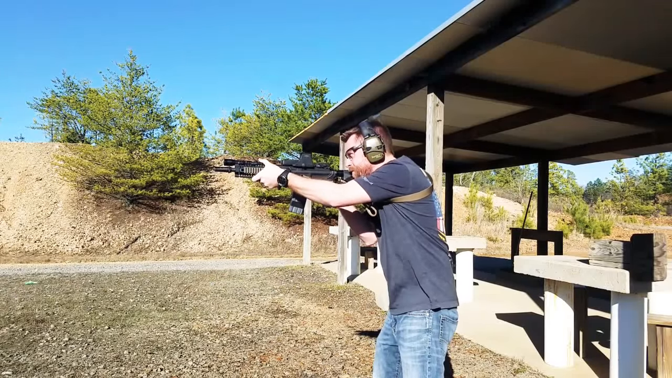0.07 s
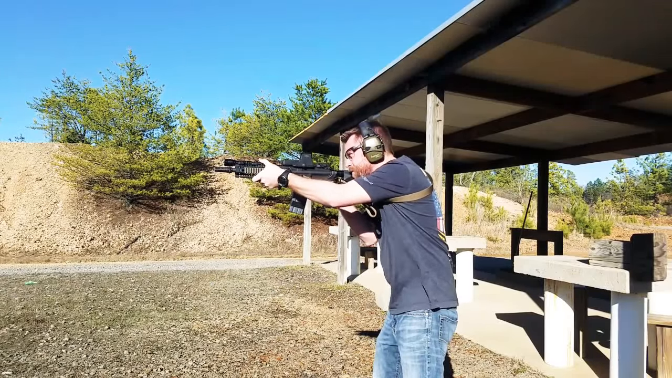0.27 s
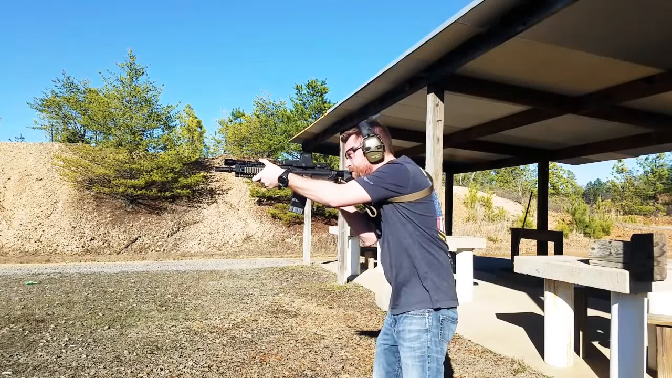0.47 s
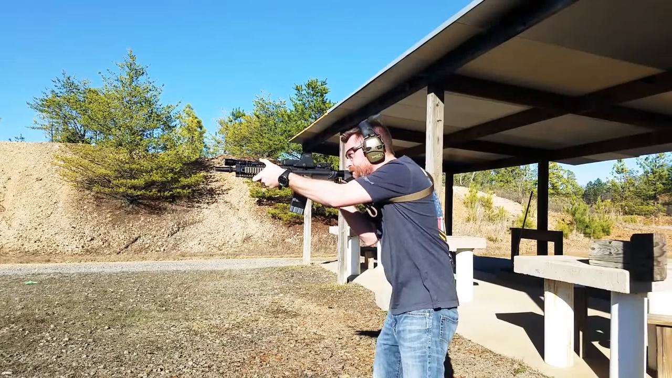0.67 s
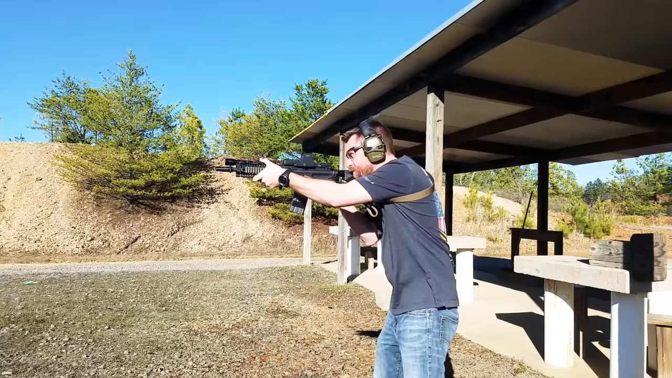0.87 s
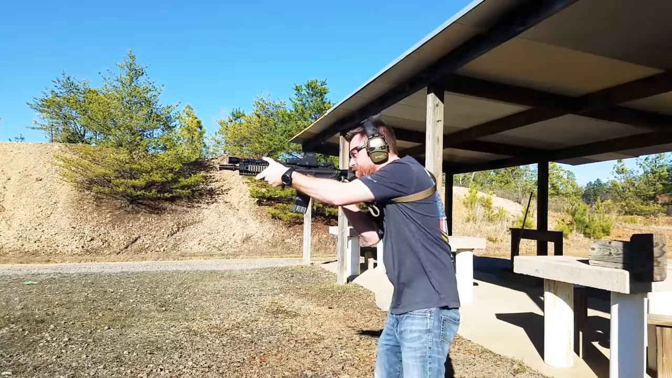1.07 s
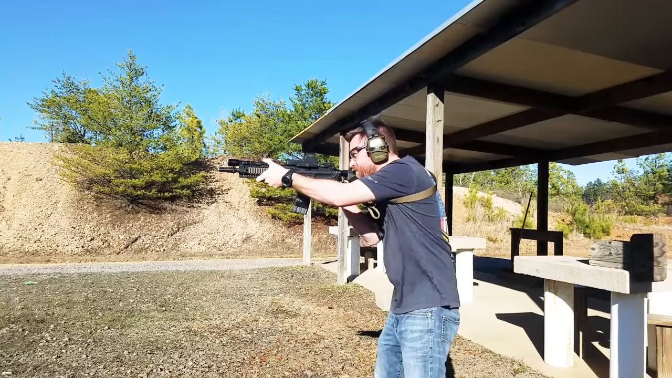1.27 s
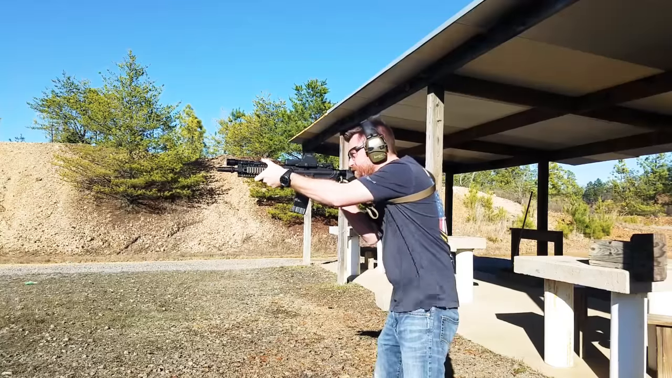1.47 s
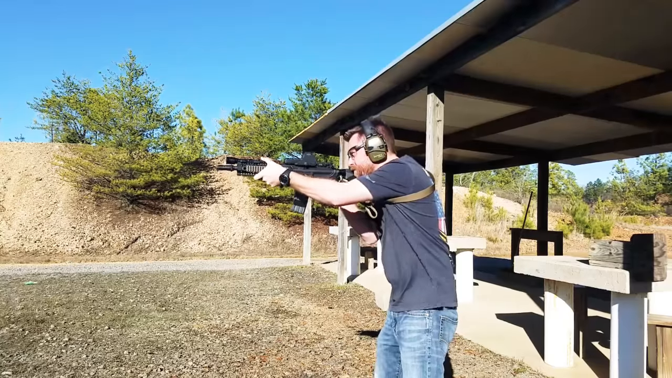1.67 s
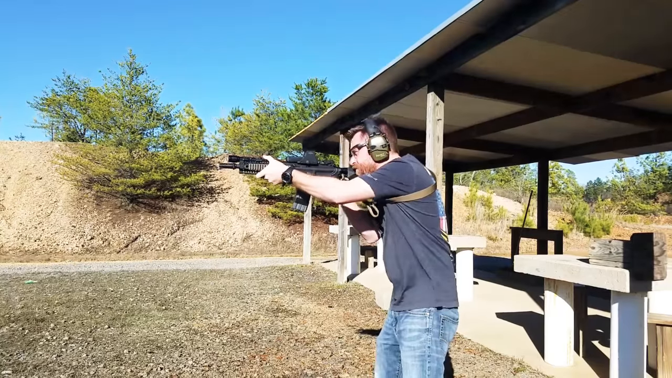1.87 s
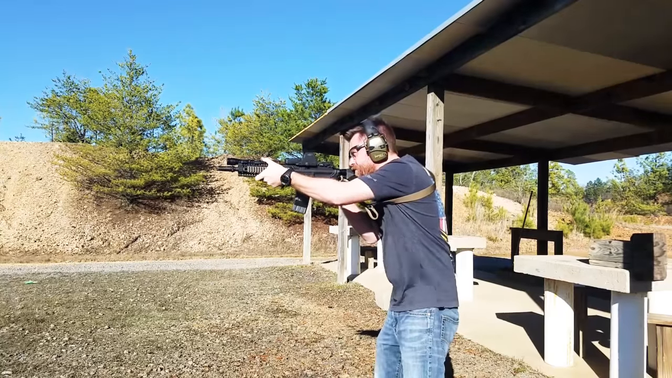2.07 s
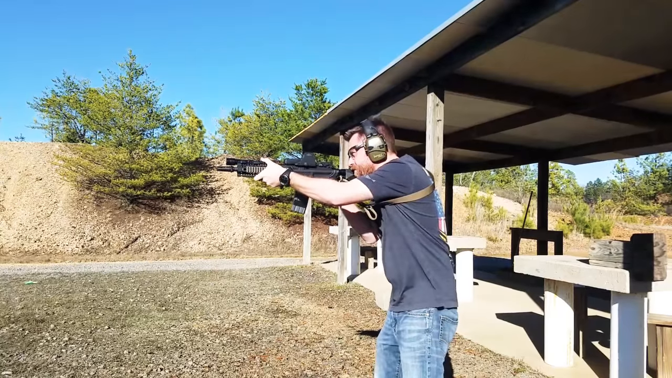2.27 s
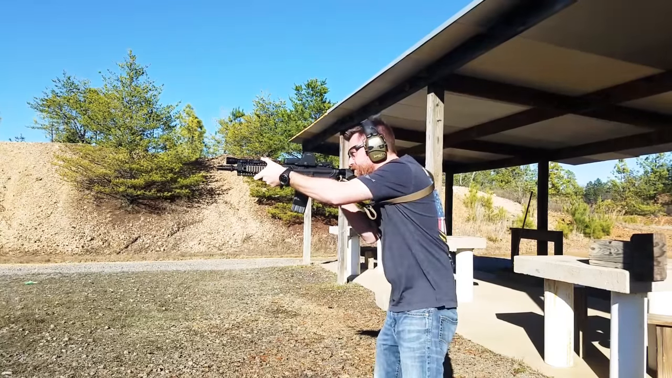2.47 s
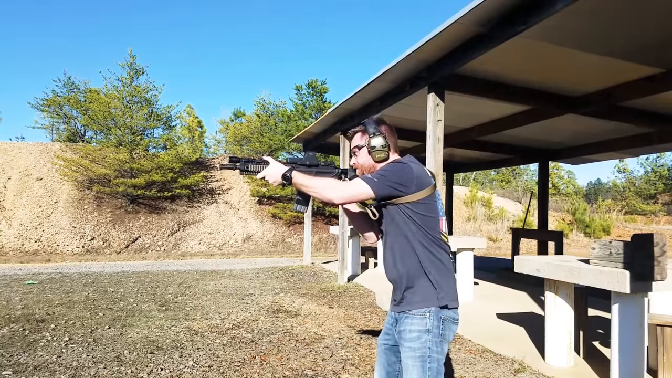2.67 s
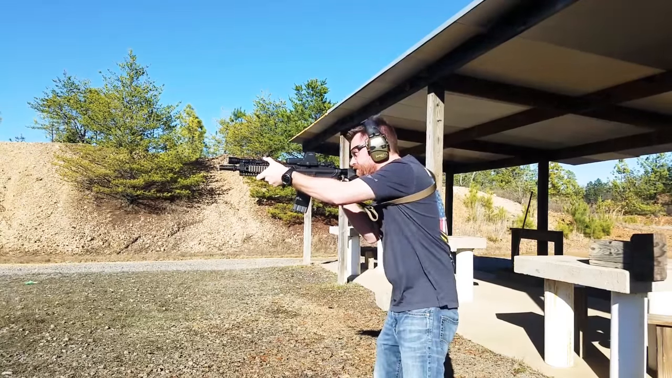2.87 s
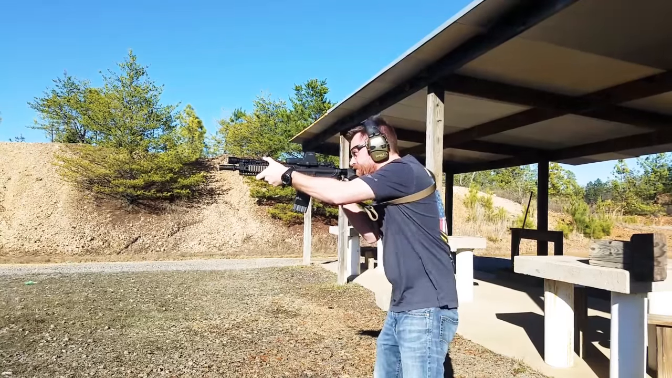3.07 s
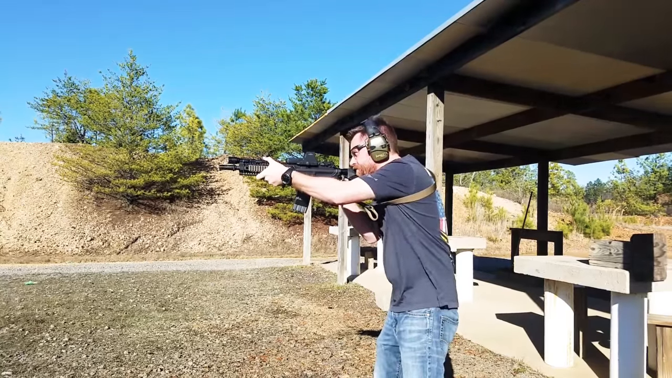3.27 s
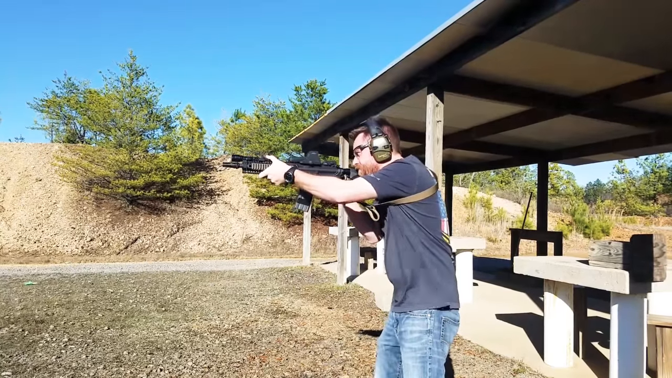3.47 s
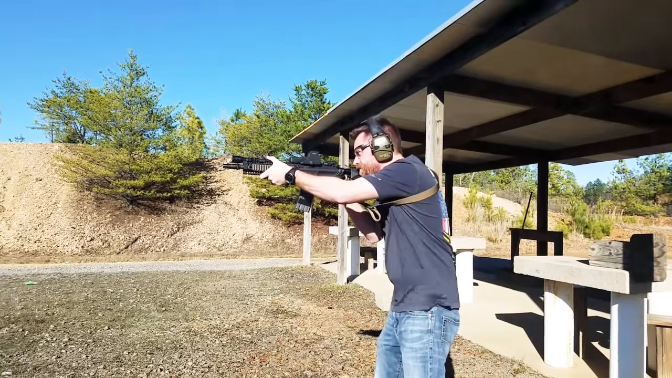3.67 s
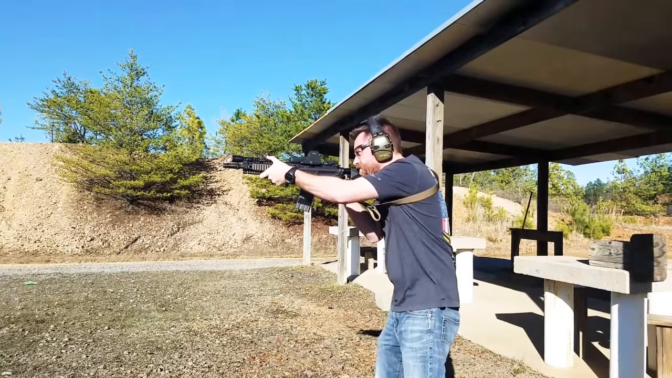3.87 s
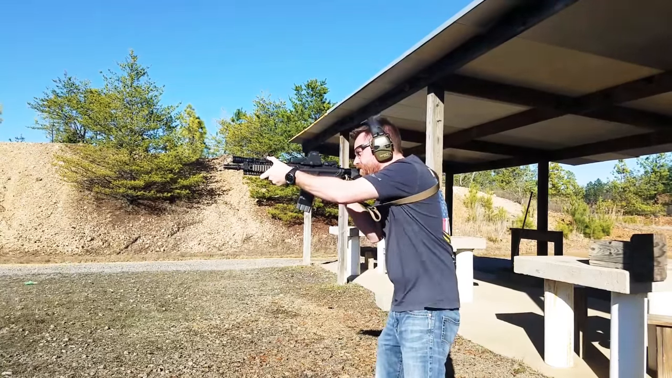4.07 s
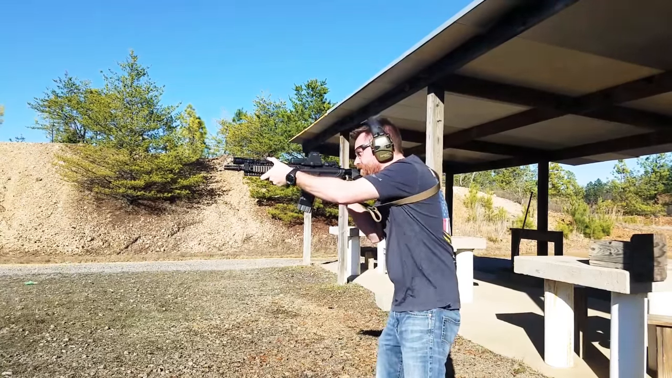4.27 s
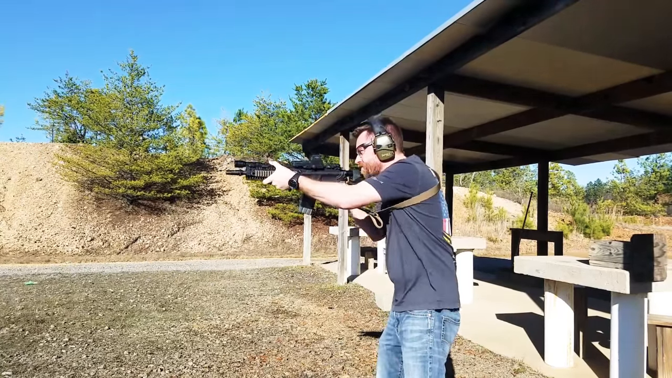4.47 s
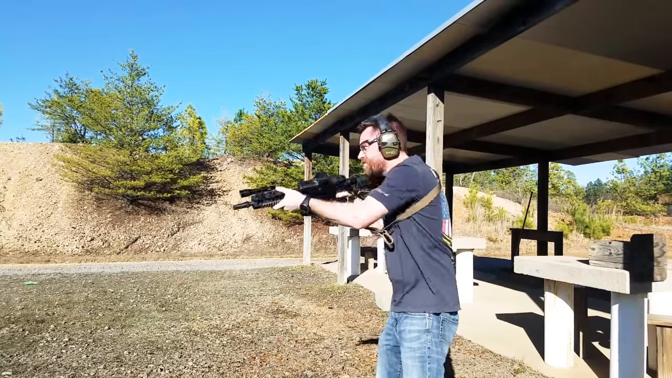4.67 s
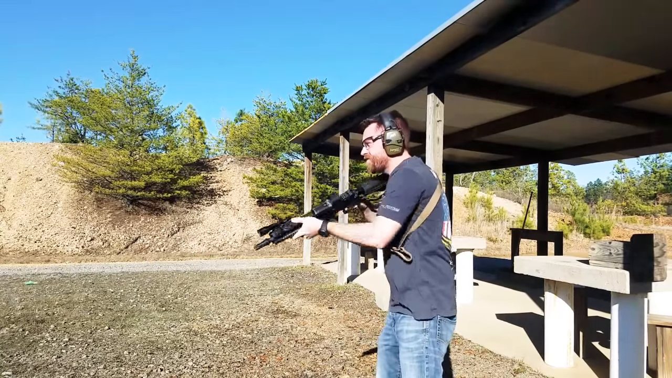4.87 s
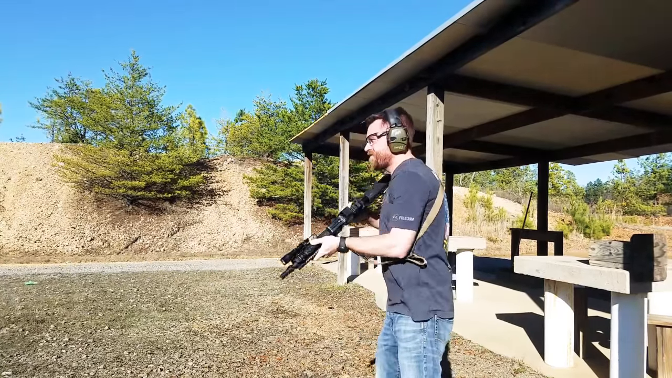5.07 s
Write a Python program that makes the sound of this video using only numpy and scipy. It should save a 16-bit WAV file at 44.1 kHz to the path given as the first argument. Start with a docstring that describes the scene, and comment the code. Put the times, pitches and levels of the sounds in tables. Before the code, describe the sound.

Four evenly spaced suppressed rifle shots crack at an open-air range, each roaring under a roof and washing out through woods, with light wind rumble.

```python
"""Wind buffets two microphone ports over an even hiss of distant trees; then a trigger clicks and a rifle fires.
Four suppressed shots sound beside a roofed firing line: bright noise cracks, low thumps and ringing steel sines.
Each is answered by noise and resonances roaring under the roof, echoes off the banks and a long wash from the woods.
Metal clicks dryly and a spent case rings as it bounces; a gain control dips at each shot and holds before rising."""
import sys
import numpy as np
from scipy import signal
from scipy.fft import rfft, irfft
from scipy.io import wavfile
from scipy.ndimage import uniform_filter1d, minimum_filter1d

SR = 44100
rng = np.random.default_rng(int(sys.argv[2]) if len(sys.argv) > 2 else 0)


def dump_mix(stems):
    """Bounce the given channels to the path in sys.argv[1] as a 16-bit WAV at rate SR."""
    frames = np.atleast_2d(stems).T  # one column per channel
    limited = np.clip(frames, -1, 1)  # hard clip at full scale
    pcm = np.round(limited * 32767).astype(np.int16)
    wavfile.write(sys.argv[1], SR, pcm)


N = 225428
AGE = np.arange(2 * SR) / SR  # seconds since an onset


def undb(db):
    """Level and amplitude: every 20 dB is a factor of ten in gain."""
    return 10 ** (np.asarray(db) / 20)


def unit(x):
    """Normalisation: scale to an rms of 1 over all channels."""
    return x / np.sqrt(np.mean(x ** 2))


def read(points, hz):
    """Spectral interpolation: read (Hz, value) points on a log-frequency axis."""
    point_hz, value = np.transpose(points)
    return np.interp(np.log(hz + 0.00092), np.log(point_hz), value)  # the offset avoids log(0)


def hump(centre_hz, octaves):
    """Band-limited spectrum: a bell of (Hz, dB) points, `octaves` wide between its -1 dB points."""
    steps = np.arange(-9, 10)
    hz = centre_hz * 2 ** (steps * octaves / 2)
    return np.transpose([hz, -steps ** 2])


def noise(points, size, lag_ms=0.28, alike_hz=1600):
    """Spatial coherence: coloured noise reaches the left port later, and only its bass is alike at both."""
    hz = np.fft.rfftfreq(size, 1 / SR)
    right, other = rfft(rng.standard_normal((2, size)))
    alike = 1 / (1 + (hz / alike_hz) ** 2)
    left = alike * right + np.sqrt(1 - alike ** 2) * other
    left = left * np.exp(-2j * np.pi * hz * lag_ms / 1000)  # a delay is a phase slope
    coloured = np.array([left, right]) * undb(read(points, hz))
    return unit(irfft(coloured, size))


def tone(hz, lag_ms=0.325):
    """Simple harmonic motion: a sine of rms 1 that reaches the left port later."""
    lag_s = np.array([[lag_ms / 1000], [0]])
    cycles = hz * (AGE - lag_s) + rng.random()
    return np.sqrt(2) * np.sin(2 * np.pi * cycles)


def fade(t60, hold=0):
    """Exponential decay: full level until hold, then a fall of 60 dB in each t60 seconds."""
    return np.exp(-np.log(1000) * np.maximum(AGE - hold, 0) / t60)


def swell(rise_s):
    """Gradual onset: a rounded rise towards full level."""
    return 1 - np.exp(-(AGE / rise_s) ** 2)


def burst(sound, envelope):
    """Energy conservation: shape a steady sound in time, keeping the energy that the envelope promises."""
    promised_rms = np.sqrt(np.mean(envelope ** 2) * np.mean(sound ** 2))
    return unit(sound * envelope) * promised_rms


def walk(rate):
    """Random fluctuation: smooth wandering of spread near 1, with `rate` new values a second."""
    step = int(SR / rate)
    stairs = np.repeat(rng.standard_normal(N // step + 1), step)
    return unit(uniform_filter1d(stairs, step)[:N])


def add(out, s, sound):
    """Superposition: mix a sound in from time s."""
    start = int(s * SR)
    part = sound[:, :out.shape[1] - start]
    out[:, start:start + part.shape[1]] += part


# Colour of air rumbling on the ports. Each row: frequency in Hz, relative spectral level in dB;
# the frequencies shift with the strength of the wind.
WIND_COLOUR = [(13, -38.5), (22, -24), (69, -1), (124, 0.5), (174, -4.5), (204, -5.5), (352, -6.5),
               (538, -16.5), (753, -19), (1500, -35.5), (1950, -66.5), (3300, -120)]
BRIGHTER_OCTAVES_PER_DB, USUAL_DB = 0.047, -51.5  # upward shift; level at which the colour is unshifted


def airflow(db, size):
    """Turbulence: faster air sheds quicker eddies, so a stronger rumble is brighter."""
    shift = 2 ** (BRIGHTER_OCTAVES_PER_DB * (db - USUAL_DB))
    colour = [(hz * shift, level) for hz, level in WIND_COLOUR]
    return undb(db) * noise(colour, size, lag_ms=0.076, alike_hz=25)


# Gusts on the ports. Each row: start in seconds, rise in seconds, length held before fading in seconds,
# level in dB before flutter and the balance of the ports.
GUSTS = [(0.408, 0.07, 0.41, -54.5), (0.89, 0.0056, 1.35, -50), (2.85, 0.11, 1.34, -50),
         (4.199, 0.018, 0.29, -50.5), (4.46, 0.067, .6, -48)]
CALM_DB, GUST_T60_S = -58, 0.3


def gusts(flutter_db=2.5):
    """Unsteady flow: gusts swell, hold and drop over a light breeze, fluttering separately at each port."""
    buffet = airflow(CALM_DB, N)
    for s, rise, length, db in GUSTS:
        add(buffet, s, airflow(db, len(AGE)) * swell(rise) * fade(GUST_T60_S, hold=length))
    return buffet * undb(flutter_db * np.array([walk(25), walk(25)]))


# The strongest eddies. Each row: start in seconds, level in dB before its envelope and the balance of the ports.
EDDIES = [(.018, -52.5), (0.698, -47), (.787, -42.5), (0.899, -50.5), (4.989, -52), (5.057, -47.5)]
EDDY_HZ = 118


def eddies():
    """Pressure pulses: strong eddies slap the ports with short low noise."""
    out = np.zeros((2, N))
    for s, db in EDDIES:
        slap = noise(hump(EDDY_HZ, 0.63), len(AGE), lag_ms=0.12, alike_hz=25)
        envelope = swell(rise_s=0.0012) * fade(t60=0.063, hold=0.022)
        add(out, s, undb(db) * burst(slap, envelope))
    return out


# Colour of the distant trees. Each row: frequency in Hz, relative spectral level in dB.
TREES_COLOUR = [(290, -38.5), (500, -1), (659, -4.5), (856, -6.5), (1280, -13.5), (1330, -13), (1800, -7),
                (2380, -14), (3000, -20), (4300, -25.5), (9560, -30.5), (13500, -27.5)]


def distant_trees(trees_db=-70):
    """Broadband noise: distant trees hiss almost evenly, wavering slightly."""
    hiss = noise(TREES_COLOUR, N, lag_ms=.05, alike_hz=1488)
    return hiss * undb(trees_db + .4 * walk(1.8))


def breeze(right_db=4.0):
    """Near-field turbulence: wind strikes the right port harder, while distant trees hiss at both."""
    balance = undb(np.array([[-right_db], [right_db]]) / 2)
    return (gusts() + eddies()) * balance + distant_trees()


def contact(centre_hz, scatter_db):
    """Impact excitation: a light metal contact gives a short click and a faint scatter from the roof."""
    decay = fade(t60=0.012) + undb(scatter_db) * fade(t60=0.085)
    return noise(hump(centre_hz, 0.96), len(AGE)) * swell(rise_s=0.0015) * decay


# Clicks of trigger and action. Each row: start in seconds, level in dB before the envelope, centre in Hz.
CLICKS = [(1.0219, -41, 7000), (1.778, -49, 2420), (2.425, -52, 3000), (2.606, -28.5, 1200),
          (3.2115, -55, 3430)]


def trigger_and_action():
    """Damped impact: the trigger and action click dryly, in bands of noise."""
    out = np.zeros((2, N))
    for s, db, hz in CLICKS:
        add(out, s, undb(db) * contact(hz, scatter_db=-10.5))
    return out


# Colour of the crack. Each row: frequency in Hz, relative spectral level in dB.
CRACK_COLOUR = [(47, -51), (80, -32), (339, -5), (731, -1.5), (971, 2), (2040, -5.5), (2380, -8),
                (2600, -5.5), (3610, -10), (4210, -11), (6970, -17.5), (14000, -13.5), (15000, -26.5)]


def crack(t60):
    """Impulsive radiation: bullet and action give a bright noise burst, abrupt in onset and quick to decay."""
    sound = noise(CRACK_COLOUR, len(AGE), lag_ms=0.38, alike_hz=894)
    return burst(sound, fade(t60, hold=0.011))


STEEL_HZ, STEEL_T60_S = 7490, 0.59


def steel_ring():
    """Modal vibration: the steel rings in one high mode, held briefly and then damped."""
    return tone(STEEL_HZ, lag_ms=0.3197) * fade(STEEL_T60_S, hold=0.18)


ROAR_HOLD_S, HOLD_LOSS_PER_OCTAVE = 0.062, 0.063  # hold at 1 kHz; share lost per octave upward
ROAR_T60_S, BOOM_HZ = 0.37, 90  # decay time well above BOOM_HZ; it nears double below
TAIL_HZ = 30000  # frequency at which the tail's decay time is halved; higher bands fade sooner


def roar_envelope(hz, build_s=0.02, steepness=11.0, tail_t60=0.91, tail_db=-17):
    """Reverberation: reflections pile up under the roof, stay a moment and drain away, the treble first."""
    hold = ROAR_HOLD_S * (1 - HOLD_LOSS_PER_OCTAVE) ** np.log2(hz / 1000)
    t60 = ROAR_T60_S * (1 + 1 / (1 + (hz / BOOM_HZ) ** 2))
    build = 1 - np.exp(-(AGE / build_s) ** steepness)
    tail = undb(tail_db) * fade(tail_t60 / (1 + hz / TAIL_HZ), hold)
    return build * np.hypot(fade(t60, hold), tail)


# Colour of the roar. Each row: frequency in Hz, relative spectral level in dB.
ROAR_COLOUR = [(35, -61.5), (60, -31.5), (174, -23), (289, -6), (408, -2), (619, -5), (679, -6),
               (875, -5.5), (1050, -10), (1300, -12), (1420, -11), (2470, -17), (3580, -25.5),
               (14000, -35.5), (15000, -55.5)]


def roof_scatter(scatter_db=-13, lumpy_db=1.5):
    """Diffuse reflection: clustered arrivals make a rough roar, each band with its own decay."""
    size = len(AGE)
    lumps = undb(lumpy_db * walk(350)[:size])
    spectrum = rfft(unit(noise(ROAR_COLOUR, size) * lumps))
    bin_hz = np.fft.rfftfreq(size, 1 / SR)
    centres = np.geomspace(60, 15000, 17)
    out = np.zeros((2, size))
    for hz, share in zip(centres, np.eye(len(centres))):
        # overlapping triangular bands on the log-frequency axis
        weight = read(np.transpose([centres, share]), bin_hz)
        band = irfft(spectrum * weight, size)
        out += undb(scatter_db) * burst(band, roar_envelope(hz))
    return out


# Resonances of the shelter. Each row: frequency in Hz, relative level in dB.
SHELTER_MODES = [(314, -33.5), (376.8, -26), (431.5, -37.5), (479.1, -40.5), (538.3, -35.5), (581.4, -39.5),
                 (602.9, -39), (683.7, -41.5), (764.4, -33.5), (882.9, -43.5), (925.9, -39), (995.9, -47),
                 (1136, -43), (1157, -49.5), (1244, -47.5), (1545, -49.5), (1604, -52), (1809, -53),
                 (1976, -56), (2126, -50), (2455, -64), (2815, -51.5)]


def shelter_resonance(shelter_db=3.0):
    """Standing waves: the shelter sounds at its resonances, which build and drain with the roar."""
    out = np.zeros((2, len(AGE)))
    for hz, db in SHELTER_MODES:
        out += undb(db + shelter_db) * tone(hz, lag_ms=0.32) * roar_envelope(hz)
    return out


# Dull echoes off roof, benches and banks. Each row: delay in seconds, level in dB before the envelope
# and the roar level of the shot.
REFLECTIONS = [(.031, -13.5), (.053, -14), (.089, -14.5), (.126, -20), (.251, -34.5), (0.286, -37),
               (0.522, -47)]
ECHO_HZ, ECHO_OCTAVES, ECHO_T60_S, SMEAR_S_PER_S = 413, 0.88, .04, .06  # smear: added t60 per second of delay
BANK_DELAY_S, BANK_DB, BANK_HZ, BANK_T60_S = .2515, -37.5, 1580, 0.026  # level before the envelope and roar level


def echoes():
    """Discrete reflection: dull returns smear with distance, and the earth bank gives one sharp slap."""
    out = np.zeros((2, len(AGE)))
    for delay, db in REFLECTIONS:
        envelope = swell(rise_s=0.0023) * fade(ECHO_T60_S + SMEAR_S_PER_S * delay, hold=0.0074)
        dull = noise(hump(ECHO_HZ, ECHO_OCTAVES), len(AGE))
        add(out, delay, undb(db) * burst(dull, envelope))
    slap = burst(noise(hump(BANK_HZ, 0.85), len(AGE)), fade(BANK_T60_S, hold=0.0016))
    add(out, BANK_DELAY_S, undb(BANK_DB) * slap)
    return out


# Colour of the wash from the woods. Each row: frequency in Hz, relative spectral level in dB.
WOODS_COLOUR = [(150, -40), (300, -13.5), (516, -6.5), (800, -14), (1100, -13), (1500, -11.5),
                (2000, -11.5), (2700, -16), (3400, -23.5), (4400, -24.5), (5500, -37), (9000, -35.5),
                (12000, -68)]


def woods_wash(woods_db=-47, woods_t60=2.76, build_s=0.063, trunks_db=2.3):
    """Multiple scattering: the woods return a long wash in which single trunks stand out."""
    size = len(AGE)
    wash = noise(WOODS_COLOUR, size, lag_ms=0.45, alike_hz=2520) * swell(build_s) * fade(woods_t60)
    return undb(woods_db + trunks_db * walk(140)[:size]) * wash


def range_answer():
    """Impulse response: roof, banks and woods answer a muzzle blast in one fixed way, as the rifle stays put."""
    return roof_scatter() + shelter_resonance() + echoes() + woods_wash()


def gas_thump():
    """Gas expansion: a low noise burst swells, holds briefly and decays."""
    sound = noise(hump(200, 1.1), len(AGE), lag_ms=0.1, alike_hz=1500)
    return burst(sound, swell(rise_s=0.008) * fade(t60=0.14, hold=0.023))


# The shots; the first cracks less and thumps more. Each row: start in seconds, crack level in dB,
# crack t60 in seconds, gain on the range's answer in dB, thump level in dB, steel ring level in dB.
# Crack, thump and ring levels are those before their envelopes.
SHOTS = [(1.0314, -17.5, 0.091, 4, -23.5, -50.5), (1.8428, -11.5, 0.12, 2.5, -31, -44.5),
         (2.6263, -10, 0.11, 3, -37, -50), (3.4035, -10.5, 0.14, 2.5, -37, -44.5)]


def rifle(thump_delay_s=.022):
    """Superposition: each shot sums a crack, a later thump, ringing steel and the answer of the range."""
    out, answer = np.zeros((2, N)), range_answer()
    for s, crack_db, crack_t60, roar_db, thump_db, ring_db in SHOTS:
        add(out, s, undb(crack_db) * crack(crack_t60))
        add(out, s, undb(ring_db) * steel_ring())
        add(out, s, undb(roar_db) * answer)
        add(out, s + thump_delay_s, undb(thump_db) * gas_thump())
    return out


# Modes of the spent case. Each row: frequency in Hz, relative level in dB, t60 in seconds.
CASE_MODES = [(9960, -6, 0.28), (10160, -2.5, 0.3), (13840, -16, .2)]


def case_ring():
    """Modal synthesis: the struck case rings as a sum of decaying sines."""
    modes = sum(undb(db) * tone(hz) * fade(t60) for hz, db, t60 in CASE_MODES)
    return swell(rise_s=0.0015) * modes


# The last case lands and bounces once. Each row: start in seconds, click level in dB before the envelope,
# gain on the ring in dB.
CASE_LANDINGS = [(4.273, -57, -60), (4.483, -66, -79)]
CASE_HZ = 10570


def spent_case():
    """Repeated impact: the case clicks and rings as it lands, then more faintly as it bounces."""
    out = np.zeros((2, N))
    for s, click_db, ring_db in CASE_LANDINGS:
        click = undb(click_db) * contact(CASE_HZ, scatter_db=-6)
        add(out, s, click + undb(ring_db) * case_ring())
    return out


def scene():
    """Superposition: breeze, metal clicks, rifle and spent case sound together."""
    return breeze() + trigger_and_action() + rifle() + spent_case()


HOLD_S, RELEASE_S, THRESHOLD_DB = .57, .12, -18
TOP_HZ = 14750


def record(dry, lift_db=11):
    """Dynamic compression: quiet is lifted, loud sound drops the gain and holds it; peaks round, the top is cut."""
    power = uniform_filter1d(np.mean(dry ** 2, axis=0), size=128)
    loudness = np.sqrt(np.abs(power) + 1e-12)
    gain = np.clip(undb(THRESHOLD_DB) / loudness, 1, undb(lift_db))
    # the shifted windows look back over the whole hold and release times
    hold, release = int(HOLD_S * SR / 2), int(RELEASE_S * SR / 2)
    gain = minimum_filter1d(gain, 2 * hold + 1, origin=hold, mode="nearest")
    recovering = uniform_filter1d(gain, 2 * release + 1, origin=release, mode="nearest")
    gain = np.minimum(gain, recovering)  # falls at once, rises gradually
    levelled = dry * gain
    rounded = levelled / (1 + levelled ** 4) ** .25
    low_pass = signal.ellip(10, .2, 70, TOP_HZ, fs=SR, output="sos")
    return signal.sosfilt(low_pass, rounded)


dry = scene()
out = record(dry)
dump_mix(out)
```